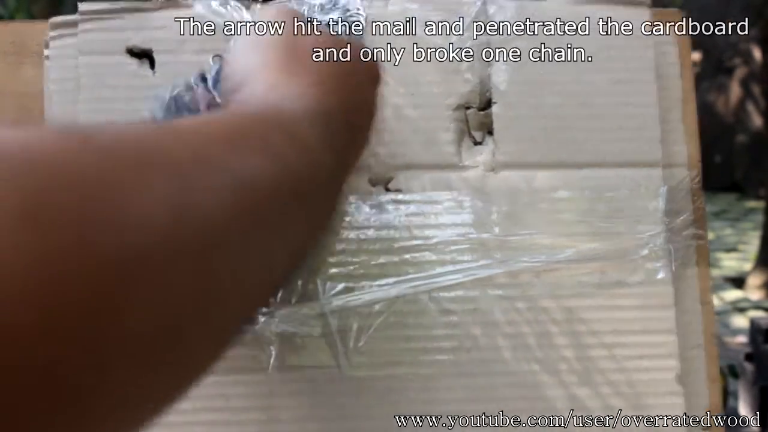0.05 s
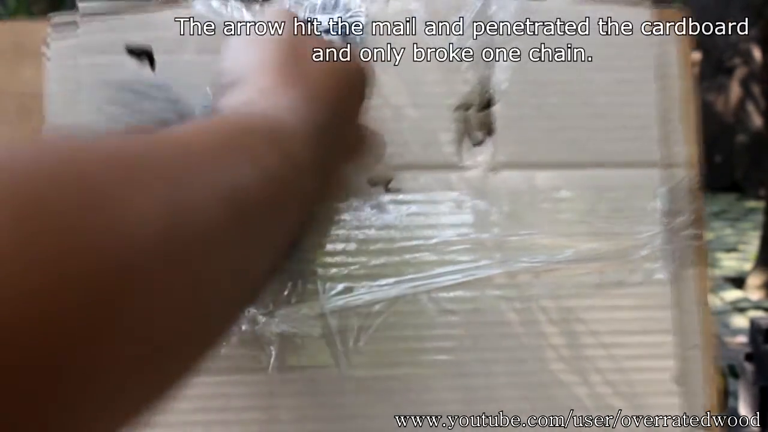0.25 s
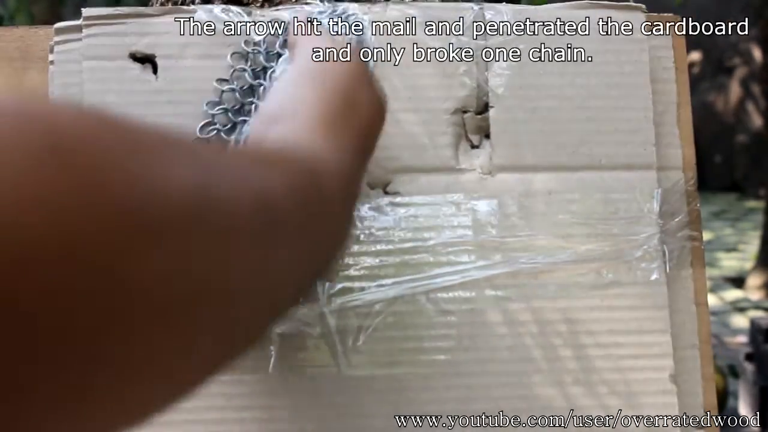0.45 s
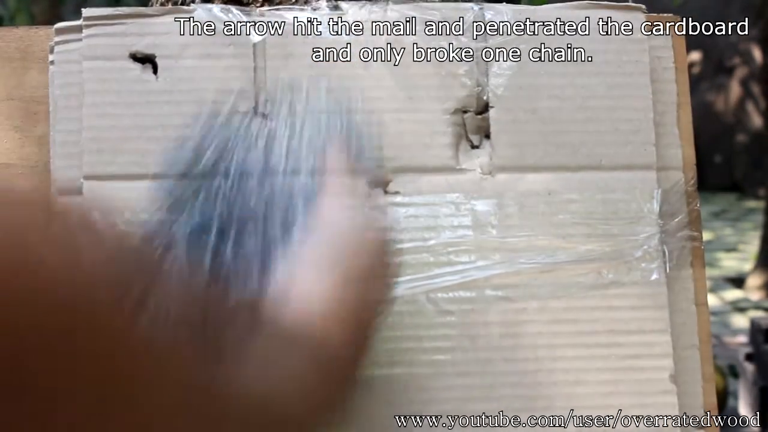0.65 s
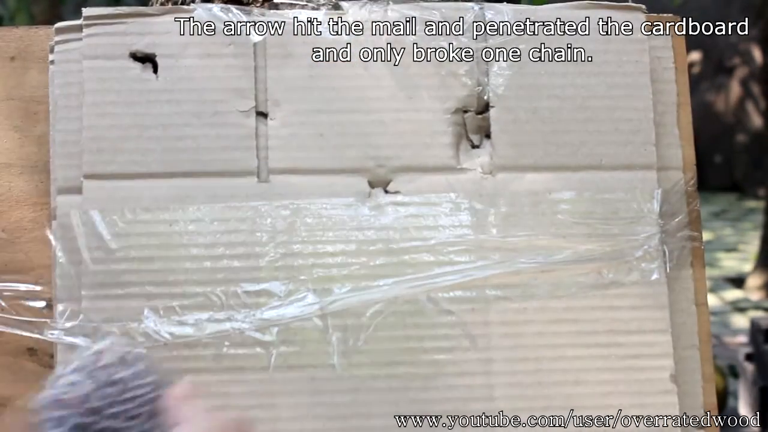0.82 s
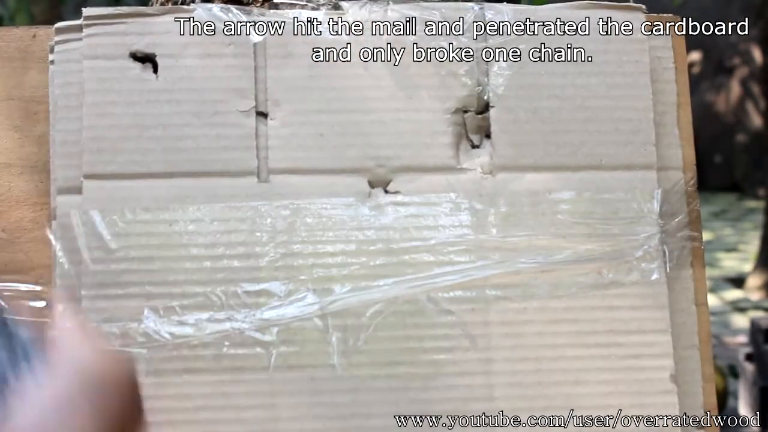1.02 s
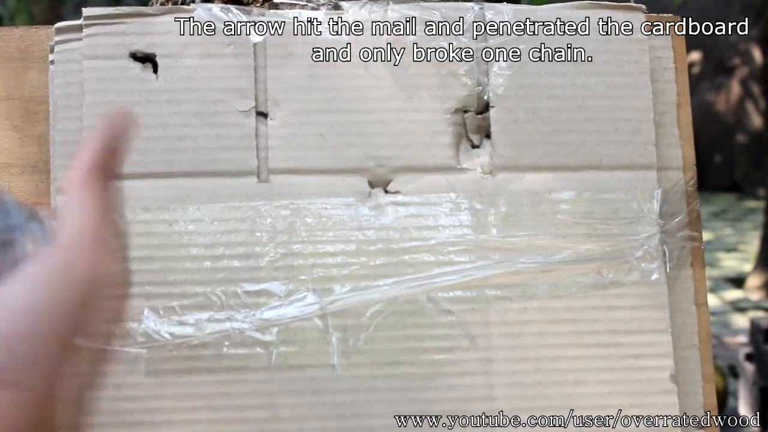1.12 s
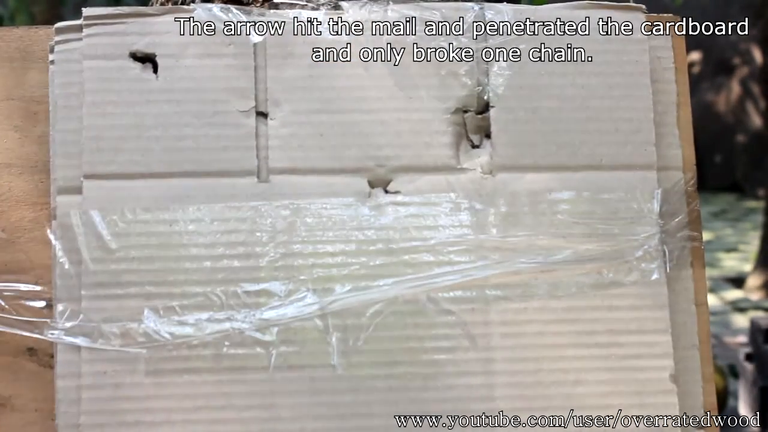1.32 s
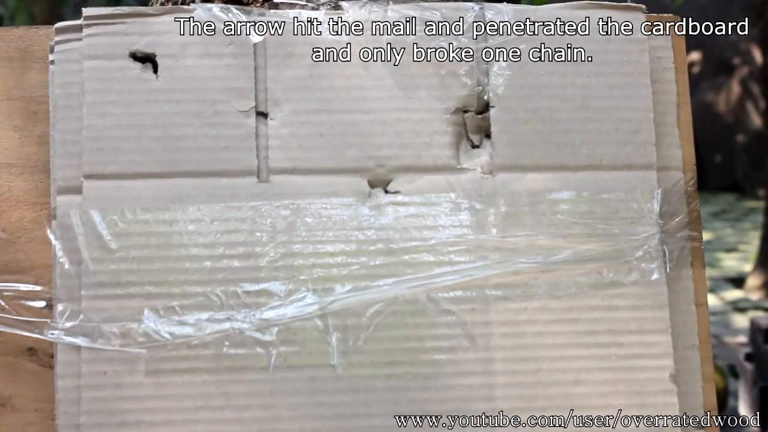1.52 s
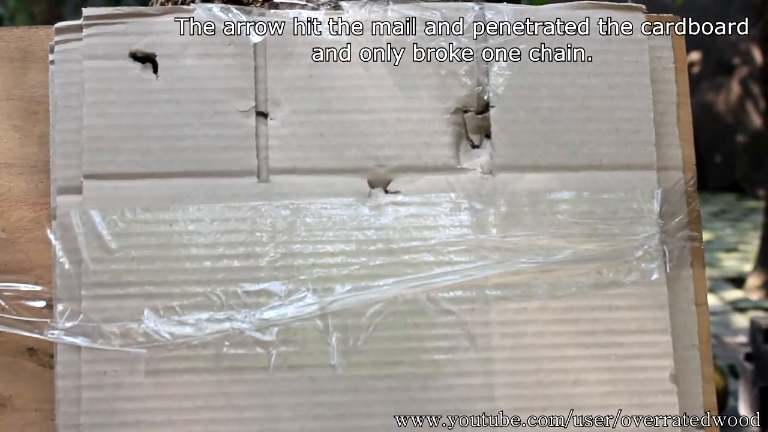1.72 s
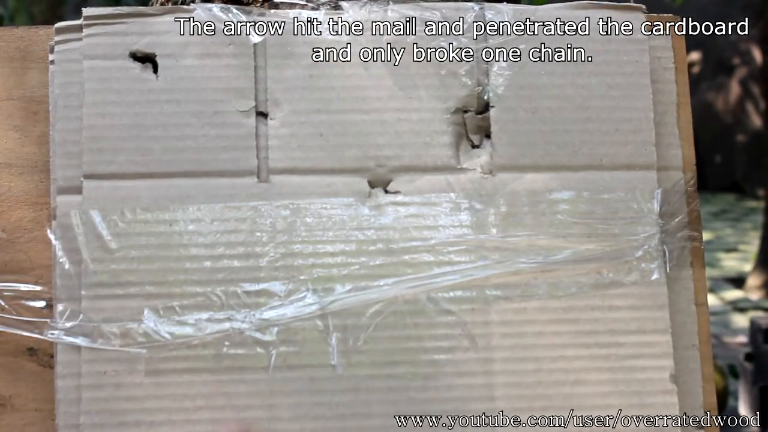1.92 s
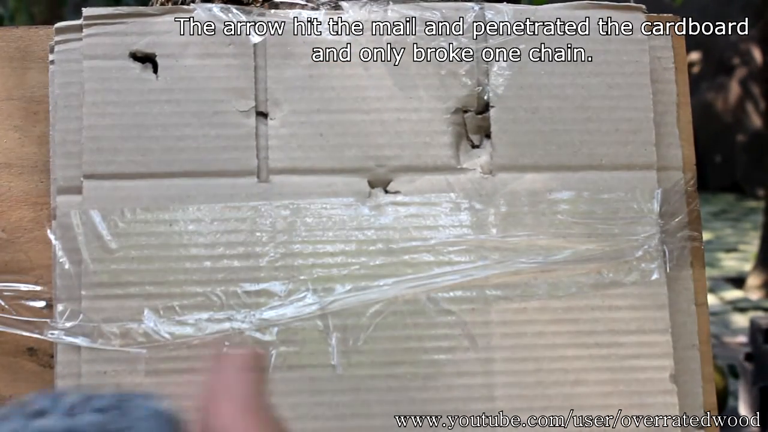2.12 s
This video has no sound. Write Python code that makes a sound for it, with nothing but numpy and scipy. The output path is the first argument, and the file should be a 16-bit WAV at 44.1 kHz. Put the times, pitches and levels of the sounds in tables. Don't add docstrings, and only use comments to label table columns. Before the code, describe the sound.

Close up outdoors, small steel rings rasp across a cardboard target, knock it hard once, rip off sticky tape in rapid cracks, scrape free, then rattle and tinkle before settling over a low far-off traffic hum.

```python
import sys
import numpy as np
from scipy import signal
from scipy.fft import rfft, irfft, next_fast_len
from scipy.io import wavfile
from scipy.ndimage import uniform_filter1d, map_coordinates

SR = 44100
rng = np.random.default_rng(int(sys.argv[2]) if len(sys.argv) > 2 else 0)


def inscribe(sig):
    pcm = np.round(np.clip(np.atleast_2d(sig).T, -1, 1) * 32767)
    wavfile.write(sys.argv[1], SR, pcm.astype(np.int16))


def invert_db(level):
    return 10 ** (np.asarray(level, dtype=float) / 20)


N = 94815
TOP_HZ = 15850


def unit(x):
    return x / np.sqrt(np.mean(x ** 2) + 1e-20)


def along(points, hz):
    f, db = np.transpose(points)
    return invert_db(np.interp(np.log(hz + 1), np.log(f + 1), db, left=-120, right=-120))


def curve(rows, col):
    rows = np.array(rows)
    return np.interp(np.arange(N) / SR, rows[:, 0], rows[:, col])


def wobble(rate):
    return map_coordinates(rng.standard_normal(N // 100), [np.arange(N) * rate / SR])


def filtered(x, response):
    m = next_fast_len(N + 8192)
    return irfft(rfft(x, m) * response(np.fft.rfftfreq(m, 1 / SR)), m)[:N]


def resonances(peaks):
    def response(f):
        total = 0
        for k, (hz, width, db) in enumerate(peaks):
            damping = 1j * f * width
            total = total + (-1) ** k * invert_db(db) * damping / (hz * hz - f * f + damping)
        return total
    return response


def place(s, rows):
    at = np.round(np.asarray(s) * SR).astype(int)[:, None] + np.arange(rows.shape[1])
    return np.bincount(at.ravel(), rows.ravel(), N + SR)[:N]


def grit(count, scatter_db):
    when, sign, size = rng.random((count, 3)).T
    pulses = np.sign(sign - 0.5) * invert_db(-scatter_db * np.log(size + 1 / 50))
    return unit(place(when * N / SR, pulses[:, None]))


def patchy(x):
    z = signal.stft(x, nperseg=512)[2]
    field = uniform_filter1d(rng.standard_normal(z.shape), size=7, axis=0)
    field = uniform_filter1d(field, size=5, axis=1)
    patch_db = 1.8 * unit(field)
    return unit(signal.istft(z * invert_db(patch_db), nperseg=512)[1][:N])


# frequency in Hz, level in dB.
AIR_COLOUR = [(15, -56), (25, -8), (148, -3.5), (502, -13.5), (641, -17), (859, -16.5), (1020, -18.5),
              (1120, -20), (8500, -39.5), (11000, -71), (18700, -120)]
# centre in Hz, width in Hz, level in dB rms.
ENGINES = [(86, 11, -41.5), (138.5, 25, -62.5)]
ENGINE_FADES = [-7, 7.5]


def outdoors():
    air = patchy(filtered(rng.standard_normal(N), lambda f: along(AIR_COLOUR, f)))
    air = air * invert_db(-41.5 + 0.25 * wobble(3.8) + 0.6 * wobble(17))
    for (hz, width, db), fade_db in zip(ENGINES, ENGINE_FADES):
        band = filtered(rng.standard_normal(N), lambda f: resonances([(hz, width, 0)])(f) ** 2)
        air = air + unit(band) * invert_db(db + fade_db * np.arange(N) / SR + 0.5 * wobble(6.2))
    return air


# start in seconds, peak in dB, pitch in Hz, 60 dB decay in seconds.
BLOWS = [(.3395, 6.5, 440, 0.018), (.3397, -32, 350, 0.062), (.356, -19, 467, 0.038),
         (.372, -21, 780, 0.013), (.43, -23, 680, .04), (.752, -16.5, 440, 0.077), (0.63, -24, 1900, 0.046),
         (.245, -19.5, 600, 0.041), (.714, -23, 1150, 0.026), (1.11, -28.5, 150, 0.18),
         (1.37, -28, 142, 0.18), (.97, -32, 250, .1)]


def thumps():
    attack_s, board_low_hz = 0.00052, 168
    s, db, hz, t60 = np.transpose(BLOWS)[:, :, None]
    t = np.arange(4000) / SR
    ring = np.sin(2 * np.pi * hz * t) * (1 - np.exp(-t / attack_s))
    push = place(s[:, 0], -invert_db(db - 60 * t / t60) * ring)
    return filtered(push, lambda f: 1j * f / (1j * f + board_low_hz))


# start in seconds, scrape level in dB, pressure on the board in dB over it.
DRAGS = [
    [(0.0, -40.5, -3.5), (0.024, -36.5, -1.5), (0.052, -36.5, -4.5), (0.062, -45.5, 3), (0.158, -45, -3.5),
     (0.178, -43.5, 1.5), (0.186, -44.5, 6), (0.2, -36, -29)],
    [(0.2, -42, -4), (0.236, -35.5, -0.5), (0.31, -27.5, -6), (0.34, -24.5, -8.5), (0.352, -23.5, 5),
     (0.382, -36, 11), (0.524, -41, -9), (0.54, -48, 1)],
    [(0.68, -32.5, -3.5), (0.686, -31, -9.5), (0.768, -25.5, -7.5), (0.842, -40, -11), (0.876, -39.5, -3.5),
     (0.906, -44, -22), (0.92, -42.5, 5), (0.98, -51.5, -28)],
]
# frequency in Hz, level in dB.
CARD_COLOUR = [(410, -31), (700, -12), (1090, -5.5), (1830, -2.5), (2680, -1), (7640, -8), (12000, -7.5),
               (15600, -6), (22000, -120)]
# frequency in Hz, level in dB.
TAPE_COLOUR = [(410, -42), (700, -5.5), (1590, -8.5), (4120, -1.5), (8790, -15), (11900, -2), (15800, -25)]
# time in seconds, level in dB.
TAPE_TEAR = [
    (0.588, -58),
    (0.6, -32),
    (.617, -29),
    (.626, -21.5),
    (0.633, -24),
    (0.637, -33),
    (0.643, -19),
    (0.657, -25),
    (.67, -50),
]
# frequency in Hz, width in Hz, level in dB.
BOARD_MODES = [(315, 114, -6), (438, 84, -2), (579, 106, -3.5), (847, 150, -6), (1090, 430, -11.5)]


def scrape():
    rows = sum(DRAGS, []) + [(1.12, -54.5, 0.0047), (1.2, -99, 0)]
    level_db = curve(rows, 1)
    pressure_db = np.minimum(curve(rows, 2), 4)
    rub = grit(count=8000, scatter_db=3) + invert_db(-5) * rng.standard_normal(N)

    card = patchy(filtered(rub, lambda f: along(CARD_COLOUR, f)))
    card = card * invert_db(level_db - 1 + 1.53 * wobble(130.1))

    tear_db = curve([(0, -99)] + TAPE_TEAR + [(0.8, -99)], 1)
    stick_db = 2 * wobble(250)
    tape = unit(filtered(grit(count=20000, scatter_db=5.0), lambda f: along(TAPE_COLOUR, f)))
    tape = tape * invert_db(tear_db + stick_db)

    body = unit(filtered(rub, resonances(BOARD_MODES)))
    body = body * invert_db(level_db + pressure_db + 1.5 + 2.6 * wobble(70.16))
    return card + tape + body


# start in seconds, peak in dB, centre in Hz.
RELEASES = [(0.0372, -17, 4300), (0.051, -13, 5940), (0.176, -21, 4180), (.249, -14, 1490),
            (.349, -9, 4070), (.352, -14, 2400), (0.3544, -2.5, 2090), (0.362, -19, 2480),
            (.372, -11, 1560), (0.4252, -14, 10300), (.4708, -23, 1500), (.4799, -17.5, 5300),
            (0.725, -11, 11500), (0.733, -12, 2520), (.814, -15, 5600), (.868, -12, 1600),
            (0.872, -20, 5530), (0.9226, -23, 1200), (.8705, -20, 1300), (0.94, -20, 6000),
            (1.346, -10, 9800)]
# start in seconds, peak in dB, centre in Hz.
TAPE_SNAPS = [(.5603, -14, 4500), (.5705, -22, 4300), (.5806, -18, 11500), (.586, -23, 5200),
              (.5882, -21, 13000), (.5952, -22, 1600), (.6023, -19, 4500), (.6062, -5, 10000),
              (.6068, -11, 3500), (.6126, -10, 7500), (.6132, -13, 3800), (.6197, -10, 4400),
              (.6228, -12, 6000), (.6255, -7, 4100), (.627, -14, 12000), (.6294, -11, 4050),
              (.6315, -10, 3700), (.6332, -10, 4100), (.6334, -14, 13500), (.64, -10, 9650),
              (.6427, 0, 11500), (.6429, -7, 3500), (.6462, -11, 6600), (.6486, -4, 4600),
              (1.0938, -11, 13500), (1.0963, -12, 14500), (1.1603, -25, 4300)]
# start in seconds, peak in dB, centre in Hz.
SLIPS = [(.0145, -21, 2960), (.0358, -18, 13000), (.0385, -15, 8000), (.1005, -32, 8000),
         (.2115, -24, 4000), (.2395, -12.5, 9000), (.2455, -7, 4800), (.305, -15, 2980), (.3228, -13, 3000),
         (.3285, -12.5, 3000), (.4308, -19, 3000), (.451, -18, 5700), (.515, -27, 4500), (.5171, -23, 5000),
         (.5255, -25, 4300), (.6994, -16, 3300), (.7545, -15, 5500), (.767, -11, 5200), (.354, -5, 3960),
         (.3105, -13, 12000), (.7838, -10, 8950), (.7906, -15, 13500), (.8686, -29, 6040),
         (.885, -19, 12500), (.9223, -15, 5860), (.9402, -19, 9000), (1.094, -17, 9100),
         (1.2765, -13.5, 12000), (1.0962, -21.5, 5200), (.6428, -8, 10500), (1.0562, -29, 10700),
         (1.3463, -13, 9700), (1.7993, -22.5, 12000)]


def snags():
    t = np.arange(512) / SR
    f = np.fft.rfftfreq(512, 1 / SR)
    # 60 dB decay in seconds, Q
    rows = [(*r, 0.005, 2.6) for r in RELEASES + TAPE_SNAPS] + [(*r, 0.0015, 0.9) for r in SLIPS]
    cracks = []
    for s, db, hz, t60, q in rows:
        burst = rng.standard_normal(512) * invert_db(-60 * t / t60) + 2.5 * (t == 0)
        broad = invert_db(-16) * f / (f + 1500)
        crack = irfft(rfft(burst) * (resonances([(hz, hz / q, 0)])(f) + broad))
        cracks.append(invert_db(db + 1) * crack / np.abs(crack).max())
    return place([r[0] for r in rows], np.array(cracks))


def struck(s, db, hz, t60, size):
    rise_s = 0.00085
    t = np.arange(size) / SR
    decay = invert_db(db[:, None] - 60 * t / t60[:, None])
    return place(s, decay * np.sin(2 * np.pi * hz[:, None] * t) * (1 - np.exp(-t / rise_s)))


# time in seconds, strength in dB.
SHAKES = [
    [(0.0, -55), (0.032, -36), (0.19, -42), (0.244, -28), (0.354, -24), (0.408, -37.5), (0.422, -30),
     (0.522, -48), (0.53, -43)],
    [(0.67, -33.5), (0.762, -25), (0.84, -37), (0.886, -29), (0.902, -48), (0.918, -36.5), (1.026, -43),
     (1.038, -37), (1.05, -35)],
    [(1.08, -46), (1.098, -36), (1.125, -36.5), (1.195, -26.5), (1.27, -30.5), (1.282, -16), (1.35, -21),
     (1.385, -39), (1.47, -42)],
    [(1.51, -49.5), (1.585, -33), (1.61, -29), (1.675, -29), (1.7, -35.5), (1.83, -47), (1.95, -41),
     (2.07, -37.5), (2.15, -41)],
]
# frequency in Hz, spread between rings in Hz, level in dB.
RING_MODES = [(4450, 109, -16), (5220, 149, -20), (9780, 330, -0.5), (12140, 930, 1.5), (14800, 430, 5)]
RING_DECAYS = [.12, .1, .07, .03, .06]
# frequency in Hz, level in dB.
RATTLE_COLOUR = [(2000, -26.5), (3500, -19.5), (5500, -17.5), (8300, -14), (9200, -4.5), (11000, -6.5),
                 (16000, -7.5)]
# start in seconds, peak in dB, pitch in Hz.
LOUD_CLINKS = [(0.4248, -15.5, 10250), (0.9667, -26, 15500), (0.9887, -21, 13900), (1.055, -26, 10700),
               (1.6, -29.5, 4500), (1.65, -32, 4350), (1.23, -32, 4450), (.459, -21, 15500),
               (1.0945, -6.5, 14540), (1.099, -16, 9650), (1.104, -35, 4200), (1.178, -27, 4860),
               (1.292, -10, 9860), (1.3, -36, 4400), (1.315, -28, 5300), (1.344, -21, 4530),
               (1.3435, -12, 9760), (1.4335, -16, 15000), (1.5419, -22, 14600), (1.568, -24, 14500),
               (1.815, -26, 15250), (1.8954, -27, 15600), (1.9245, -35, 15200), (1.937, -25, 9800),
               (1.9729, -18, 14800), (2.056, -15, 15400), (2.1, -20, 9190), (2.0664, -13.5, 10000),
               (2.0981, -17, 15300)]


def ring_mesh(shake_db, count=1600):
    when, size = rng.random((count, 2)).T
    s = when * (N - 1) / SR
    hit_db = shake_db[(s * SR).astype(int)] - 3.5 * np.log(size + 0.023)
    mesh = 0
    for (hz, spread, db), t60 in zip(RING_MODES, RING_DECAYS):
        tune, loud, damp = np.clip(rng.standard_normal((count, 3)), -2, 2).T
        pitch = np.minimum(hz + spread * tune, TOP_HZ)
        mesh = mesh + struck(s, hit_db + db + 3 * loud, pitch, t60 * invert_db(2 * damp), size=1900)
    return mesh


def clinks():
    s, db, hz = np.transpose(LOUD_CLINKS)
    db = db - 9.5
    t60 = np.full(len(s), 0.055)
    first = struck(s, db, hz, t60, size=3000)
    partner = struck(s + 0.001, db - 4.5, hz * 0.975, t60 / 2, size=3000)
    return first + partner


def jingle():
    shake_db = curve(sum(SHAKES, []), 1) + wobble(34.9)
    contacts = grit(count=6000, scatter_db=-1.0) + 0.5 * rng.standard_normal(N)
    rattle = patchy(filtered(contacts, lambda f: along(RATTLE_COLOUR, f)))
    return invert_db(-17) * ring_mesh(shake_db) + invert_db(shake_db - 7.5) * rattle + clinks()


def scene():
    return (outdoors() + thumps() + scrape() + snags() + jingle())[None]


def low_pass(x):
    return signal.sosfilt(signal.butter(12, 16820, fs=SR, output="sos"), x)


def record(dry):
    low_cut_hz, clip_top, hardness = 63, 1.05, 6
    x = filtered(dry[0], lambda f: (1j * f / (1j * f + low_cut_hz)) ** 2 * (f < TOP_HZ))
    mix = x / (1 + np.abs(x / clip_top) ** hardness) ** (1 / hardness)
    return low_pass(mix[None])


dry = scene()
out = record(dry)
inscribe(out)
```